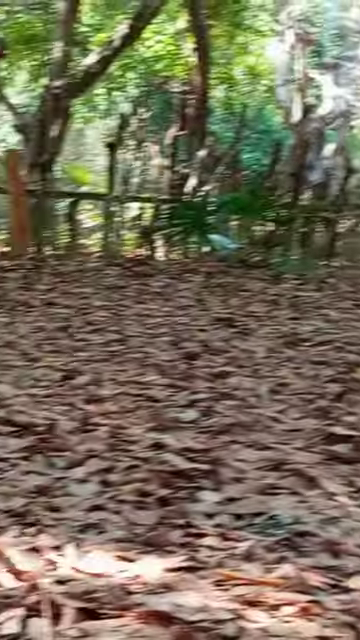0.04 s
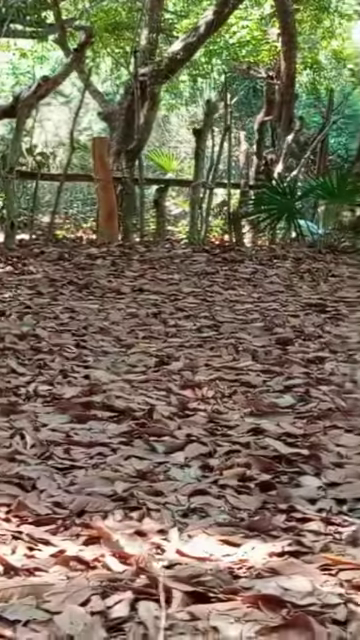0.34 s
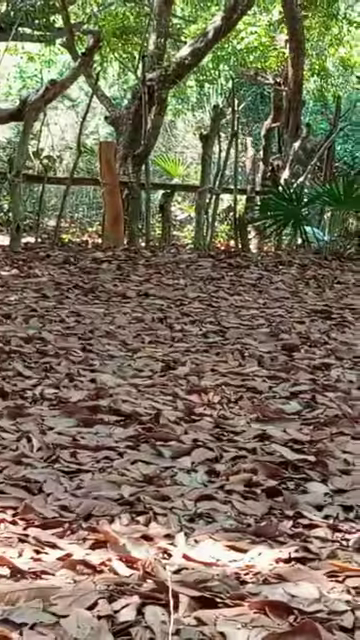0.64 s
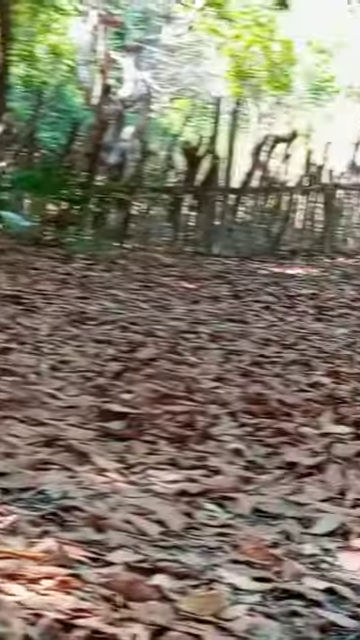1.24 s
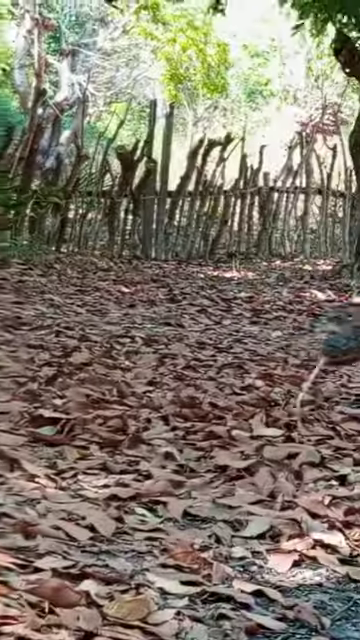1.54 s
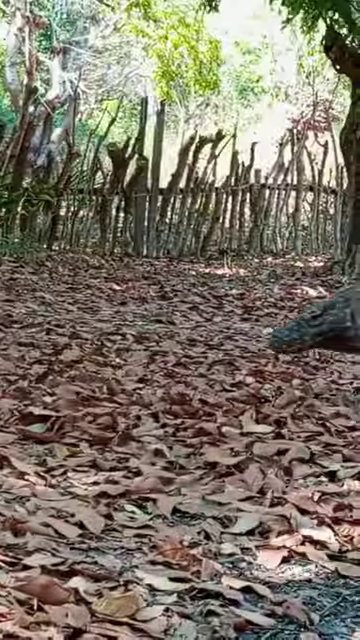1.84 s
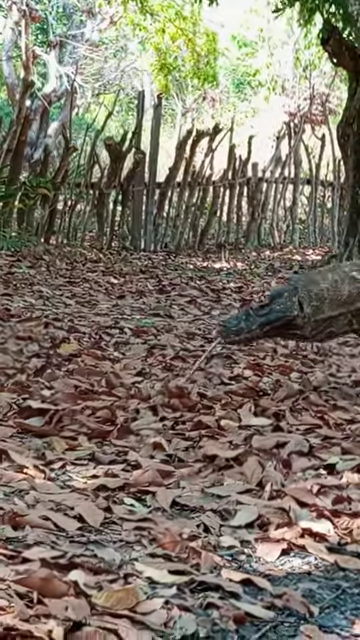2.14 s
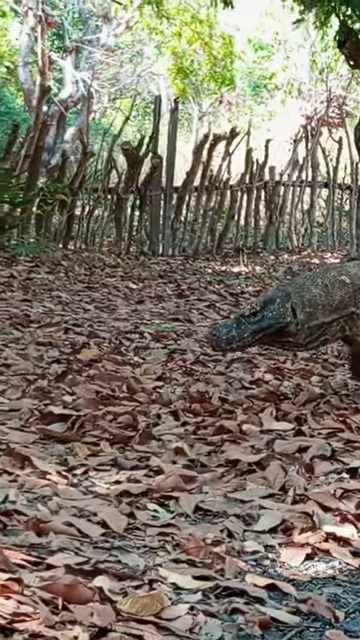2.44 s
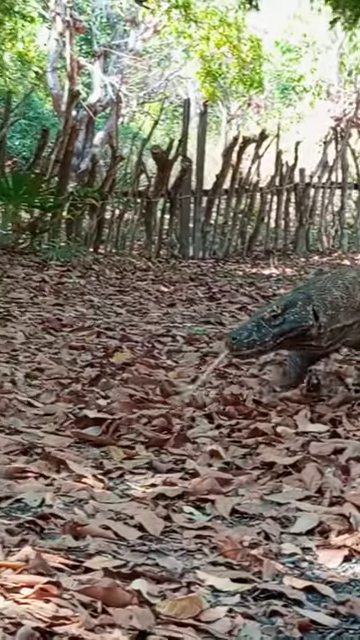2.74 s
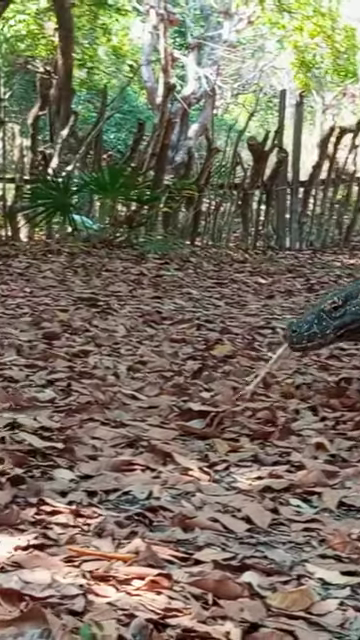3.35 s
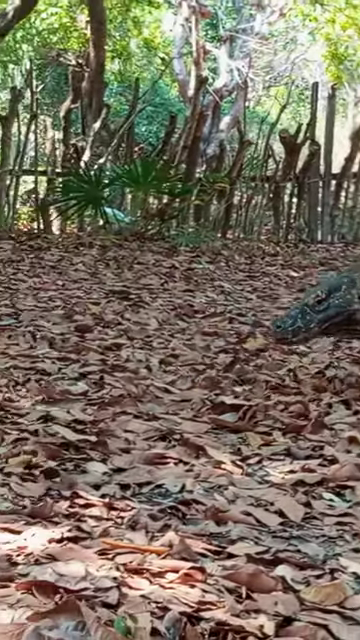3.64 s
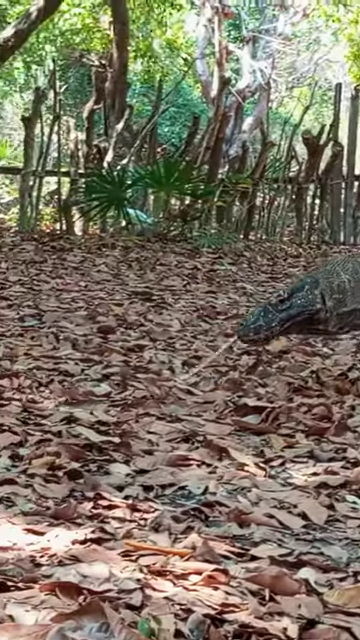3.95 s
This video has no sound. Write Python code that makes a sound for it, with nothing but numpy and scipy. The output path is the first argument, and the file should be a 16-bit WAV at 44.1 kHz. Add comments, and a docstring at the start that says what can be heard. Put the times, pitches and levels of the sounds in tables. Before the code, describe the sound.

An uneven, crackly rustle of dry leaves rises and falls under a large lizard's slow steps, with occasional brief crunches and slides. Outdoors under trees, a light breeze flutters against the nearby microphone over a faint, steady wash of air.

```python
"""Lizard on dry leaves.

Under trees, a big lizard walks slowly over a carpet of dry leaves near the microphone.
The rustle swells and fades: tiny crackles and sliding leaves, with a few scrapes and sharper crunches.
Light wind buffets the microphone in short low puffs; farther off, air washes softly through the trees."""
import sys
import numpy as np
from scipy import signal
from scipy.fft import rfft, irfft
from scipy.io import wavfile
from scipy.ndimage import uniform_filter1d

SR = 44100
rng = np.random.default_rng(int(sys.argv[2]) if len(sys.argv) > 2 else 0)


def dump(signal):
    """Clip the signal to [-1, 1] and save it as 16-bit WAV at the path in sys.argv[1]."""
    limited = np.clip(np.atleast_2d(signal).T, -1, 1)
    pcm = np.round(limited * 32767).astype(np.int16)
    wavfile.write(sys.argv[1], SR, pcm)


N = 176400
T = np.arange(N) / SR


def from_db(db):
    """Decibels to gain."""
    return 10 ** (np.asarray(db) / 20)


def rms_one(x):
    """Scale to unit power."""
    return x / np.sqrt(np.mean(x ** 2) + 1e-20)


def in_time(rows, column=1):
    """One column of a timed table at every sample."""
    rows = np.array(rows)
    return np.interp(T, rows[:, 0], rows[:, column])


def at_hz(points, hz):
    """Read a table on a log-frequency axis."""
    table_hz, value = np.transpose(points)
    return np.interp(np.log(hz + 1e-9), np.log(table_hz), value)


def drift(rate_hz):
    """A smooth random wander with a spread of 1."""
    hop, run_in = 40, 2000
    pole = np.exp(-2 * np.pi * rate_hz * hop / SR)
    noise = rng.standard_normal(N // hop + run_in + 2)
    slow = signal.lfilter([1], [1, -2 * pole, pole * pole], noise)[run_in:]
    return np.interp(np.arange(N) / hop, np.arange(len(slow)), rms_one(slow))


def shaped(x, gain_at):
    """Filter by a gain that depends on frequency; unit power."""
    hz = np.arange(len(x) // 2 + 1) * SR / len(x)
    return rms_one(irfft(rfft(x) * gain_at(hz), len(x)))


def coloured(x, colour):
    """Filter by a table of levels over frequency; unit power."""
    return shaped(x, lambda hz: from_db(at_hz(colour, hz)))


def bands(x, count):
    """Split into overlapping bands that sum to the whole: (centre [Hz], band)."""
    centres = np.geomspace(40, 15000, count)
    spectrum, hz = rfft(x), np.arange(N // 2 + 1) * SR / N
    return [(centre, irfft(spectrum * np.interp(hz, centres, weights), N))
            for centre, weights in zip(centres, np.eye(count))]


# Far air in the trees: (frequency [Hz], relative level [dB])
AIR_COLOUR = [(60, 12.5), (250, -12), (600, 0), (1200, 5), (2500, 10.5), (6000, -52.5), (15000, -7)]

def distant_air():
    """A soft steady wash from the trees around the microphone."""
    return from_db(-54.5) * coloured(rng.standard_normal(N), AIR_COLOUR)


# Buffeting at the microphone, before its roll-off: (frequency [Hz], relative level [dB])
BUFFET_COLOUR = [(22, -27), (35, -28), (50, -14), (68, 1), (120, 1), (200, -2.5), (300, -5.5), (600, -14)]

def eddies(reach_hz, samples, eddy_s=0.058, roll_off_order=3.85):
    """Low turbulent noise that falls away steeply above its reach; unit power."""
    def gain_at(hz):
        return from_db(at_hz(BUFFET_COLOUR, hz)) / np.hypot(1, (hz / reach_hz) ** roll_off_order)

    rumble = shaped(rng.standard_normal(samples), gain_at)
    span = int(eddy_s * SR)
    local_power = uniform_filter1d(uniform_filter1d(rumble ** 2, span), span) + 1e-9
    return rms_one(rumble / np.sqrt(local_power))  # evens out chance swells


# Breeze on the microphone, before the low cut: (time [s], level [dB])
BREEZE_LEVEL = [(0, -46), (.06, -55), (.16, -37.5), (.26, -39.5), (.35, -51), (.42, -39.5), (.52, -39),
                (.59, -43), (.67, -44.5), (.83, -40), (1.0, -37.5), (1.25, -38.5), (1.5, -38.5),
                (1.55, -36.5), (1.72, -41.5), (1.84, -32), (1.95, -39.5), (2.12, -32.5), (2.25, -44.5),
                (2.35, -37.5), (2.5, -42.5), (2.58, -33.5), (2.73, -40.5), (2.9, -35.5), (3.18, -52.5),
                (3.28, -34), (3.47, -35), (3.63, -41), (3.73, -36.5), (3.79, -34), (3.84, -29), (4, -33.5)]
# Puffs on the microphone, before the low cut: (start [s], length [s], level [dB], reach [Hz])
WIND_PUFFS = [(0.163, 0.0089, -41, 240), (0.408, 0.011, -40.5, 290), (0.447, .015, -34.5, 210),
              (0.859, 0.053, -40, 282), (1.058, 0.02, -33.5, 186), (1.311, 0.024, -28.5, 378),
              (1.337, 0.017, -23.5, 211), (1.37, 0.074, -26.5, 300), (1.467, 0.026, -36, 345),
              (1.625, 0.042, -30.5, 258), (1.763, 0.0155, -27.5, 178), (2.034, 0.053, -28, 239),
              (2.185, 0.027, -35.5, 212), (2.443, 0.018, -32.5, 300), (2.515, 0.0095, -34, 340),
              (2.618, .07, -31, 180), (2.761, 0.034, -34.5, 170), (2.94, 0.024, -28.5, 270),
              (2.992, 0.067, -33, 286), (3.089, .04, -31.5, 236), (3.137, 0.021, -27.5, 260),
              (3.299, 0.019, -40, 350), (3.343, 0.025, -30, 320), (3.398, 0.019, -27, 190),
              (3.453, .04, -35, 275), (3.512, 0.046, -29, 247), (3.587, 0.057, -35, 250),
              (3.862, 0.037, -28.5, 262), (3.924, 0.1, -32, 226)]

def wind_on_microphone(flutter_db=2, attack_s=0.0061, release_s=0.011, low_cut_hz=76):
    """A fluttering breeze right on the microphone, with sudden puffs that reach higher in pitch."""
    out = eddies(reach_hz=161, samples=N) * from_db(in_time(BREEZE_LEVEL) + flutter_db * drift(27))
    for start, length, db, reach_hz in WIND_PUFFS:
        end = start + length
        envelope = np.interp(T, [start - attack_s, start, end, end + release_s], [0, 1, 1, 0])
        puff = envelope * np.resize(eddies(reach_hz, samples=16384), N)
        out += from_db(db) * rms_one(puff) * np.sqrt(np.mean(envelope ** 2))
    return signal.sosfilt(signal.butter(2, low_cut_hz, "high", fs=SR, output="sos"), out)


def leaf_rings(per_s=90, decay_s=0.016, low_hz=900, high_hz=6500):
    """Flicked leaves ring briefly, each at a pitch of its own; unit power."""
    out, t = np.zeros(N + SR), np.arange(4096) / SR
    for when, pitch, size in rng.random((int(per_s * N / SR), 3)):
        start = int(when * N)
        hz = low_hz * (high_hz / low_hz) ** pitch
        out[start:start + len(t)] += (.5 + size) * np.sin(2 * np.pi * hz * t) * np.exp(-t / decay_s)
    return rms_one(out[:N])


# Tilt of the crackles against the hiss of sliding leaves: (frequency [Hz], gain [dB])
CRACKLE_COLOUR = [(500, -15), (2500, -5.5), (6000, -5.5), (9000, -1), (14000, 1.5)]

def leaf_crackles(per_s=2200, decay_s=0.00044, spread_db=1, largest_db=14):
    """Countless tiny cracks in the leaves, each a burst of noise, merge into a haze; unit power."""
    onsets = rng.random(N) < per_s / SR
    sizes = from_db(np.minimum(rng.exponential(spread_db, N), largest_db))
    power = signal.lfilter([1], [1, -np.exp(-2 / (decay_s * SR))], onsets * sizes ** 2 + 1e-18)
    return coloured(np.sqrt(power) * rng.standard_normal(N), CRACKLE_COLOUR)


# Broad colour of the leaf carpet, heard close: (frequency [Hz], gain [dB])
LEAF_COLOUR = [(300, -5.5), (630, -4.5), (800, -9), (1300, -7.5), (1600, -7), (2500, -1), (3100, -7.5),
               (3500, -6), (4200, -4), (5600, 1), (7000, -5), (8400, -1), (9400, -.5), (10700, -14),
               (12500, -14.5), (14200, -25.5), (15500, -32)]
# Papery resonances of the dry leaves: (frequency [Hz], width [Hz], gain [dB])
LEAF_RESONANCES = [(940, 52, 2.5), (1346, 100, 2.5), (1820, 130, 3), (2470, 61, 1.5), (2690, 110, 3.5),
                   (3220, 56, 5), (3990, 100, 2.5), (4960, 130, 3), (5770, 50, 4.5), (8650, 180, -0.5)]

def leaf_noise():
    """Crackles, sliding hiss and faint rings, all coloured by the dry leaves; unit power."""
    def gain_at(hz):
        peaks_db = sum(db / (1 + (2 * (hz - centre) / width) ** 2)
                       for centre, width, db in LEAF_RESONANCES)
        return from_db(at_hz(LEAF_COLOUR, hz) + peaks_db)

    crackles = from_db(-5.5) * leaf_crackles()
    hiss = from_db(-6) * rng.standard_normal(N)
    rings = from_db(-19.5) * leaf_rings()
    return shaped(crackles + hiss + rings, gain_at)


# Leaves pushed aside on the ground: (middle [s], half length [s], level [dB], centre [Hz])
LEAF_SCRAPES = [(0.407, 0.071, -51.5, 3300), (.75, .08, -43.5, 2570), (0.87, 0.022, -36, 4700),
                (1.127, 0.027, -38, 5900), (2.044, 0.027, -43, 5350), (2.62, 0.043, -48.5, 2400),
                (2.99, 0.067, -46, 5560), (3.44, .045, -45, 2460)]

def scrapes(width_octaves=0.25):
    """Leaves slide aside; each scrape swells and fades in its own band of the leaf noise."""
    leaves, out = leaf_noise(), np.zeros(N)
    for middle, half_length, db, centre_hz in LEAF_SCRAPES:
        band = shaped(leaves, lambda hz: np.exp(-.5 * (np.log2((hz + 1) / centre_hz) / width_octaves) ** 2))
        swell = np.exp(-.5 * ((T - middle) / half_length) ** 2)
        out += from_db(db) * swell * band
    return out


# Single leaves breaking under the lizard: (time [s], level [dB], decay [s])
LEAF_BREAKS = [(.021, -34.5, .006), (0.1337, -31, 0.0015), (0.956, -34, 0.0076), (1.089, -31, 0.0059),
               (1.422, -45, .003), (1.62, -30, 0.0046), (1.624, -33, 0.0048), (1.709, -31, 0.0035),
               (1.715, -33, 0.0045), (3.498, -44, .004)]
# Colour of a crunch, heard close: (frequency [Hz], relative level [dB])
CRUNCH_COLOUR = [(800, -5), (3000, -3), (6500, -4), (9000, 10.5), (11000, -3.5), (15000, -12)]

def crunches():
    """A breaking leaf gives a sudden bright burst that dies in milliseconds."""
    envelope = sum(from_db(db) * (T >= start) * np.exp(-np.maximum(T - start, 0) / decay)
                   for start, db, decay in LEAF_BREAKS)
    return envelope * coloured(rng.standard_normal(N), CRUNCH_COLOUR)


# The lizard stirring the leaves nearby: (time [s], relative level [dB], midrange against treble [dB])
LIZARD_STIR = [(0, -39, 2.5), (.03, -39.5, 4), (.08, -44, 2), (.24, -47, 1.5), (.33, -48, 2),
               (.42, -44.5, 3.5), (.56, -45.5, 3.5), (.73, -45.5, 5), (.86, -38, 4.5), (.96, -39, 3),
               (1.05, -42, 3), (1.11, -38, 1.5), (1.16, -38, 1), (1.19, -42, 0.5), (1.34, -45, -0.5),
               (1.58, -41, 0), (1.68, -41, 0), (1.76, -37.5, -1), (1.87, -39.5, 1), (1.93, -43.5, 3.5),
               (2.04, -37.5, -2), (2.29, -46.5, 1), (2.46, -46, -2.5), (2.58, -41.5, -1), (2.77, -45, -.5),
               (3.0, -41, -0.5), (3.25, -38, -.5), (3.36, -41.5, 0.5), (3.49, -35.5, -2),
               (3.52, -42.5, -.5), (3.72, -49, 0.5), (4, -44, -2)]
# How far each band follows the midrange swing: (frequency [Hz], factor [ratio])
MIDRANGE_SHARE = [(500, 0.42), (1500, 0.9), (2500, 1), (4000, 1.4), (5700, 1.18), (7500, 0.65),
                  (9500, -0.39), (14000, 0.78)]

def lizard_rustle(gain_db=3.5, band_flutter_db=1.06, flutter_db=0.57):
    """The rustle follows the lizard's stirring; a heavier drag fills out the midrange."""
    level_db, midrange_db = in_time(LIZARD_STIR, column=1), in_time(LIZARD_STIR, column=2)
    swing_db = midrange_db - midrange_db.mean()
    out = sum(band * from_db(at_hz(MIDRANGE_SHARE, hz) * swing_db + band_flutter_db * drift(21))
              for hz, band in bands(leaf_noise(), count=24))
    return out * from_db(level_db + gain_db + flutter_db * drift(19))


def scene():
    """One microphone under the trees: the lizard near, wind on the capsule, air far off."""
    lizard = lizard_rustle() + scrapes() + crunches()
    return (lizard + wind_on_microphone() + distant_air())[None]


def record(dry):
    """The microphone's signal is cut steeply at the top of the treble."""
    cutoff_hz = 15550
    return signal.sosfilt(signal.ellip(12, .1, 90, cutoff_hz, fs=SR, output="sos"), dry)


dry = scene()
out = record(dry)
dump(out)
```